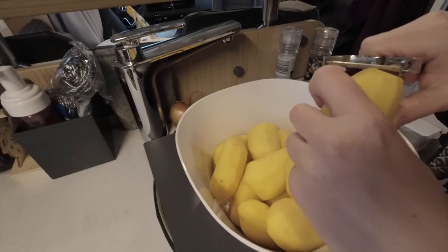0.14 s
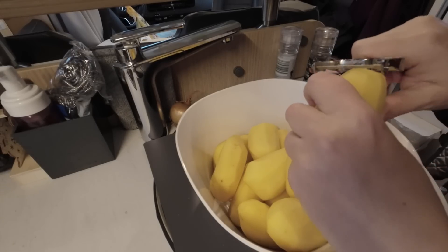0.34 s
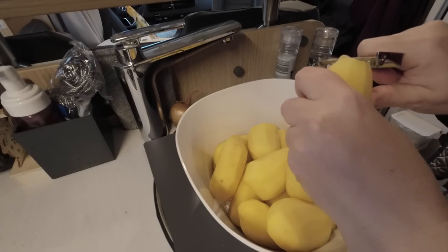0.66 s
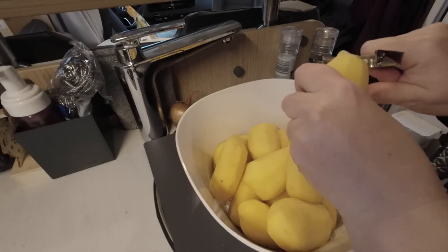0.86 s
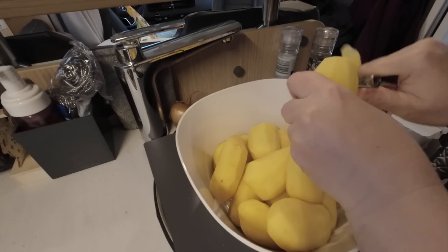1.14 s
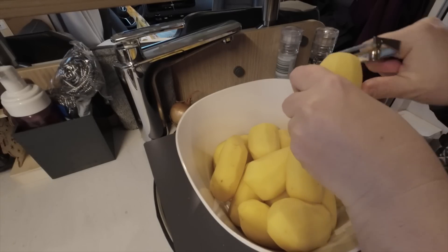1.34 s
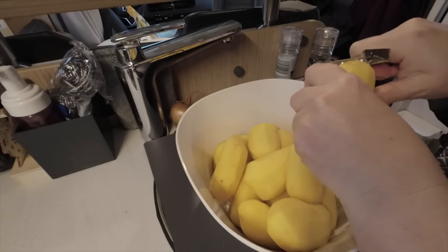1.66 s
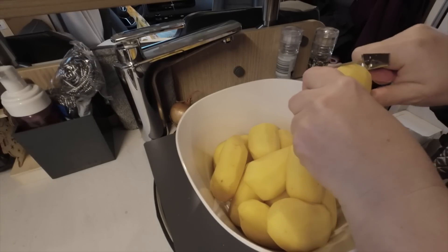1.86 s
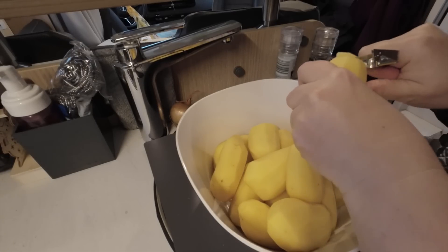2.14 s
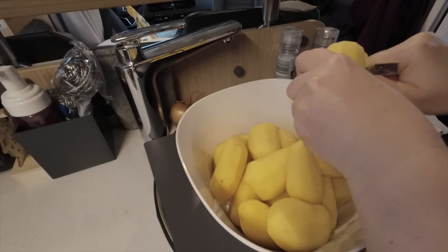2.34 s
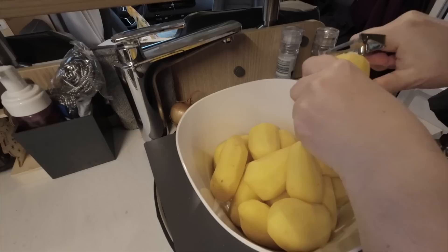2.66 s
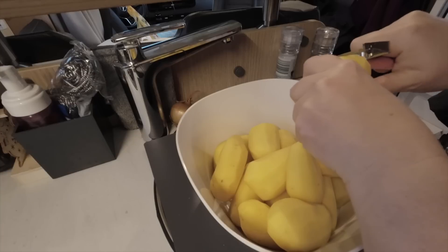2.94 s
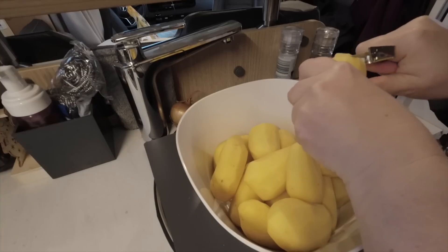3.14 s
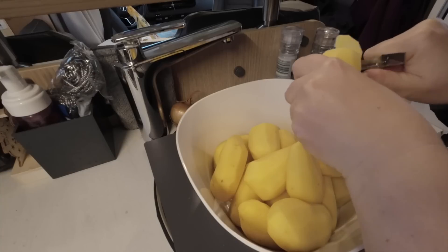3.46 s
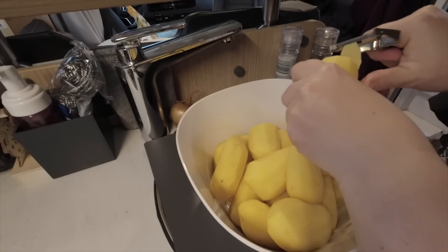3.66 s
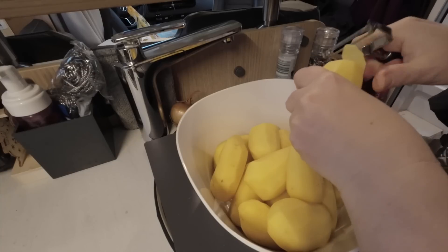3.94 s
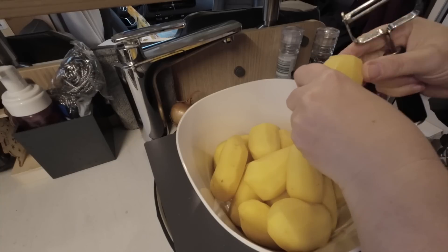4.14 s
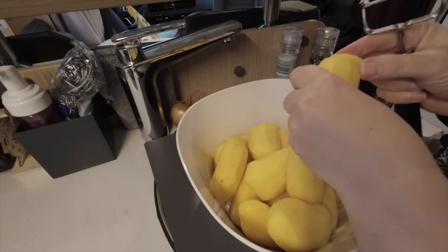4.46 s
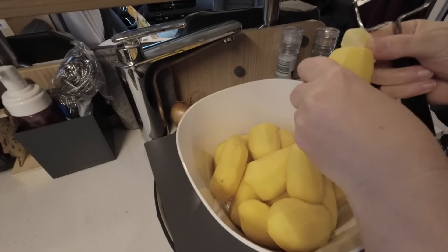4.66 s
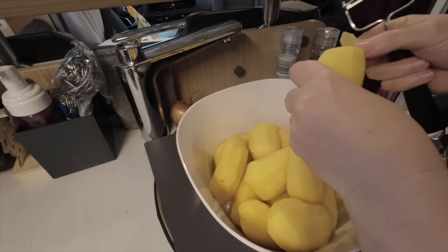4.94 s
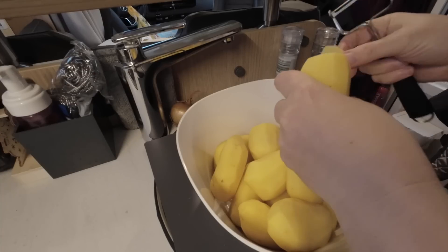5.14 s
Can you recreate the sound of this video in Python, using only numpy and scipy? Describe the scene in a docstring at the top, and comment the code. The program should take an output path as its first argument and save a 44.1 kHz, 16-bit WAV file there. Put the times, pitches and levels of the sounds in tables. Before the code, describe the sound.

A peeler takes crisp, raspy little strokes off a raw potato in a quiet kitchen, then one loud hard knock rings briefly.

```python
"""In a quiet kitchen, close to a small microphone, a swivel peeler slices a raw potato in short strokes.
The blade rasps as shaped noise grains and sings in its resonances; its catches tick as short noise bursts.
The loose frame clacks as struck modes, and the hands thud softly as damped sines.
One hard knock rings a bowl; a short dense tail of noise grains follows and breaks off.
The background, a rumble under a hiss, sinks slowly in level and is higher again after the knock."""
import sys
import numpy as np
from scipy import signal
from scipy.fft import rfft, irfft, next_fast_len
from scipy.io import wavfile

SR = 44100
rng = np.random.default_rng(int(sys.argv[2]) if len(sys.argv) > 2 else 0)


def dump(signal):
    """Clip the signal to [-1, 1] and save it as 16-bit WAV at the path in sys.argv[1]."""
    limited = np.clip(np.atleast_2d(signal).T, -1, 1)
    pcm = np.round(limited * 32767).astype(np.int16)
    wavfile.write(sys.argv[1], SR, pcm)


N = 233818

# spectrum of tearing wet flesh: (frequency [Hz], relative density [dB per Hz])
RASP_SPECTRUM = [(3500, -8), (4700, -34), (5300, -5), (6200, -1), (6700, -11.5), (7600, -2.5),
                 (9000, -13.5), (9700, -9), (11000, 9.5), (12000, 0.5), (13500, -2.5), (15300, -2.5),
                 (16500, -17)]
# duller spectrum of a deep cut: (frequency [Hz], relative density [dB per Hz])
DEEP_SPECTRUM = [(590, -38), (1000, -2), (1510, 1.5), (2130, -6.5), (2370, 5), (3000, -3.5), (5000, -12),
                 (6500, -5), (11000, -120)]

SWING_DB = 20   # envelope rise and fall are the times for this change in level


def from_db(db):
    """Level to amplitude: 20 dB is a factor of ten."""
    return 10 ** (np.asarray(db) / 20)


def rms_one(x):
    """Normalisation to unit root-mean-square amplitude."""
    return x / np.sqrt(np.mean(x ** 2) + 1e-20)


def coloured(x, spectrum):
    """Spectral shaping: x filtered by a (Hz, dB per Hz) table, suppressed by 120 dB outside it; rms 1."""
    size = next_fast_len(N)
    hz = np.arange(size // 2 + 1) * SR / size + 1   # the 1 keeps the logarithm finite
    points = np.array(spectrum)
    shape_db = np.interp(np.log(hz), np.log(points[:, 0]), points[:, 1], left=-120, right=-120)
    shaped = irfft(rfft(x, size) * from_db(shape_db), size)[:N]
    return rms_one(shaped)


def drift(rate_hz):
    """Random fluctuation: white noise through a double-pole low-pass, rms 1."""
    r = np.exp(-2 * np.pi * rate_hz / SR)
    noise = rng.standard_normal(N + SR)   # the first second lets the filter settle
    return rms_one(signal.lfilter([1], [1, -2 * r, r * r], noise)[SR:])


def ring(x, hz, t60):
    """Damped resonance: a unit click starts a sine whose undamped height is 1, losing 60 dB in t60 seconds."""
    r = from_db(-60 / (t60 * SR))
    w = 2 * np.pi * hz / SR
    return signal.lfilter([0, np.sin(w)], [1, -2 * r * np.cos(w), r * r], x + 1e-18)


def resonant(x, peaks):
    """Resonances in parallel, (Hz, width Hz, dB): decay time is inverse to bandwidth; rms 1."""
    total = np.zeros(N)
    for hz, width, db in peaks:
        t60 = np.log(1000) / np.pi / width
        total += from_db(db) * np.sqrt(width) * rms_one(ring(x, hz, t60))
    return rms_one(total)


def grains(per_s, spread_db):
    """Shot noise: impulses at random moments with uneven strength and random sign; rms 1."""
    strength = from_db(spread_db * np.minimum(rng.exponential(1, N), 4))
    signed = strength * rng.choice([-1, 1], N)
    return rms_one(signed * (rng.random(N) < per_s / SR))


def envelope_db(s, rise_s, hold_s, fall_s):
    """Exponential growth and decay: 0 dB through the hold, straight slopes in dB before and after."""
    t = np.arange(N) / SR - s
    before = t / max(rise_s, .001)
    after = (hold_s - t) / max(fall_s, .001)
    return SWING_DB * np.minimum(np.minimum(before, after), 0)


def struck(hits, modes, contact_hz, crack_t60, crack_hz):
    """Modal impact: each hit rings all modes, low-passed by the contact's finite length, plus a noise crack."""
    size = 1500   # crack length in samples
    crack_octave_db = 6.5   # a hit this much brighter per octave has a crack reaching an octave higher
    crack_fade = from_db(-60 * np.arange(size) / SR / crack_t60)
    cracks = rng.standard_normal((len(hits), size)) * crack_fade
    at = [round(hit[0] * SR) for hit in hits]

    out = np.zeros(N)
    for k, (hz, db, t60) in enumerate(modes):
        octaves = np.log2(hz / 2000)   # brightness tilts the modes about 2 kHz
        clicks = np.zeros(N)
        clicks[at] = [from_db(db + hit[1] + hit[2] * octaves) for hit in hits]
        out += (-1) ** k * ring(clicks, hz, t60)   # alternate modes start in opposite phase
    out = signal.sosfilt(signal.butter(2, contact_hz, fs=SR, output="sos"), out)

    for i, (_, db, brightness, crack_db), crack in zip(at, hits, cracks):
        top_hz = crack_hz[1] * 2 ** (brightness / crack_octave_db)
        top_hz = np.clip(top_hz, 2 * crack_hz[0], .45 * SR)
        band = signal.butter(2, [crack_hz[0], top_hz], "band", fs=SR, output="sos")
        out[i:i + size] += from_db(db + crack_db) * signal.sosfilt(band, crack)
    return out


def background():
    """Noise under slow amplitude modulation: a lumpy rumble and a smoother hiss share one level curve."""
    # level of the background noise: (time [s], level about the mean [dB])
    level_curve = [(0, 4.5), (.44, 4), (.7, 2), (1.4, 2), (2.0, 0), (2.4, -.5), (3.0, -2), (4.1, -2.5),
                   (4.48, -1.5), (4.6, 4), (4.95, 3.5), (5.3, 3.5)]
    # low background noise: (frequency [Hz], relative density [dB per Hz])
    rumble_spectrum = [(8.8, -34), (15, 3), (37, -1), (70, -6), (102, -9), (232, -16), (320, -29.5),
                       (420, -49), (700, -120)]
    # high background noise: (frequency [Hz], relative density [dB per Hz])
    hiss_spectrum = [(160, -17.5), (280, -2), (492, -3.5), (703, -6), (989, -10), (1400, -12),
                     (2100, -15.5), (4510, -23.5), (6000, -22), (8780, -29.5), (11000, -22.5),
                     (13200, -29.5), (15500, -27.5), (16500, -43)]
    level_db = np.interp(np.arange(N) / SR, *np.transpose(level_curve))
    # mean level, share of the level curve followed, and random fluctuation
    rumble_db = -54 + 1.27 * level_db + 1.0 * drift(2.8)
    hiss_db = -60 + 0.94 * level_db + 0.23 * drift(7.8)
    rumble = from_db(rumble_db) * coloured(rng.standard_normal(N), rumble_spectrum)
    hiss = from_db(hiss_db) * coloured(rng.standard_normal(N), hiss_spectrum)
    return rumble + hiss


def thuds():
    """Damped oscillation: each soft push is one sine with a rounded start, decaying sooner at higher pitch."""
    # soft contacts of hand and potato: (time [s], level before the rounded start [dB], pitch [Hz])
    contacts = [(.0935, -43.5, 1240), (0.1, -34, 121), (0.161, -44, 90), (0.236, -45, 203),
                (.237, -41.5, 500), (0.236, -41, 1150), (0.492, -36, 146), (0.831, -37.5, 166),
                (1.436, -43, 295), (2.089, -36, 109.5), (2.1, -43, 250), (2.609, -45, 177),
                (2.649, -41.5, 147), (3.133, -38, 970), (3.55, -37, 99)]
    t60_at_120_hz, damping_power = 0.059, 0.48   # seconds; exponent of pitch
    out = np.zeros(N)
    for s, db, hz in contacts:
        t = np.maximum(np.arange(N) / SR - s, 0)
        t60 = t60_at_120_hz * (hz / 120.0) ** -damping_power
        decay = from_db(db - 60 * np.minimum(t / t60, 4))
        rounded_start = 1 - np.exp(-t * hz * 2.5)
        out += decay * np.sin(2 * np.pi * hz * t) * rounded_start
    return out


def strokes():
    """Fracture noise: tearing cells rasp, excite the blade's resonances, and add a duller layer in deep cuts."""
    # bites of the blade: (time of full bite [s], rise [s], hold [s], fall [s],
    # rasp level [dB], deep cut relative to the rasp [dB])
    bites = [(0.137, .002, .001, 0.014, -46.5, -16), (0.243, .004, .001, 0.011, -59.5, 4),
             (0.28, .025, .001, .09, -61, -14), (0.493, 0.0017, 0.0075, 0.041, -44.5, -6.5),
             (0.535, 0.036, .001, 0.078, -56, -22), (0.647, 0.003, .001, 0.065, -62, -4),
             (0.697, 0.018, .001, .023, -48, -11), (0.802, 0.0022, 0.0069, 0.06, -48.5, -11.5),
             (0.925, .003, .003, 0.072, -50.5, -10.5), (1.024, 0.0022, 0.053, 0.031, -50, -11),
             (1.146, 0.016, .001, 0.034, -34.5, -15.5), (1.599, .002, .003, 0.015, -53.5, -12),
             (1.874, .02, .001, 0.05, -63, -10), (1.946, 0.0019, .001, 0.053, -41, -13),
             (1.983, .01, .001, .06, -61, -9), (2.102, 0.018, .001, 0.021, -42.5, -12.5),
             (2.14, 0.0026, .012, 0.046, -51, -8.5), (2.199, 0.0088, 0.037, 0.11, -48.5, -12),
             (2.2995, .001, 0.013, 0.03, -37.5, -16), (2.773, 0.025, .001, 0.055, -57, -10),
             (2.868, .002, .002, 0.024, -56, -15), (2.938, .024, .08, 0.055, -65, -12),
             (3.09, .01, 0.058, 0.048, -52.5, -12), (3.235, 0.0074, .008, 0.017, -52.5, -9),
             (3.288, 0.0012, .001, 0.018, -55, -13), (3.301, 0.02, .001, 0.0079, -52.5, -7),
             (3.353, 0.0093, .006, 0.014, -51.5, -13), (3.445, 0.14, .001, .06, -49, -9.5),
             (3.515, 0.0074, .004, 0.043, -46.5, -14.5), (3.958, .015, .001, .03, -62, -14),
             (4.017, .005, 0.03, .03, -64, -14), (4.703, 0.031, .001, 0.086, -48, -8),
             (4.83, 0.059, .001, 0.044, -52, -17), (4.918, .016, .001, 0.044, -62, -7)]
    # resonances of the blade: (frequency [Hz], width [Hz], relative level [dB])
    blade = [(2410, 58, -15), (5640, 270, -6), (6170, 160, -13), (7300, 310, -13), (10100, 130, 12.5),
             (10300, 150, -5), (10990, 280, -2), (11400, 400, -23), (15500, 710, -5)]
    deep_follows = 0.98   # share of the rasp's swing in dB that the deep cut follows
    slide_db, slide_rise_s, slide_fall_s = -23.5, .04, 0.12   # faint slide before and after each bite

    rasp_gain, deep_gain = np.full(N, 1e-9), np.zeros(N)
    for s, rise_s, hold_s, fall_s, db, deep_db in bites:
        bite_db = envelope_db(s, rise_s, hold_s, fall_s)
        sliding_db = slide_db + envelope_db(s, slide_rise_s, hold_s, slide_fall_s)
        rasp_gain += from_db(db + bite_db) + from_db(db + sliding_db)
        deep_gain += from_db(db + deep_db + deep_follows * bite_db)

    judder = from_db(2.8 * drift(140.0))   # the blade judders
    tears = grains(per_s=5000.0, spread_db=-1.0) * judder
    # a light touch mostly sings in the blade; pressure adds the broad rasp
    broad_share = np.clip((rasp_gain / from_db(-40.5)) ** 0.22, 0, 1.2)
    rasp = broad_share * coloured(tears, RASP_SPECTRUM) + from_db(-7.5) * resonant(tears, blade)
    deep_cut = coloured(tears[::-1], DEEP_SPECTRUM)   # reversed, so its grains fall elsewhere
    return rasp_gain * rasp + deep_gain * deep_cut


def ticks():
    """Transient excitation: each catch is a snap, then a fading burst of rasp, with a short ring of its own."""
    # catches of the blade: (time [s], peak level [dB], ring frequency [Hz])
    catches = [(0.137, -37, 5900), (0.24, -42.5, 5900), (0.4942, -30.5, 10700), (0.6934, -36, 10900),
               (0.8031, -42, 10700), (0.9281, -35.5, 10600), (1.0323, -33, 10900), (1.134, -34.5, 10500),
               (1.1433, -48, 10200), (1.1494, -36, 6400), (1.224, -47, 6030), (1.2409, -44, 5500),
               (1.6007, -34.5, 10500), (1.9456, -27.5, 15200), (1.9556, -29, 10600), (1.9774, -32, 10700),
               (1.9907, -31, 11000), (2.095, -38.5, 10700), (2.302, -22.5, 10900), (2.3144, -40, 6200),
               (2.3214, -29.5, 9810), (2.346, -43, 6310), (2.392, -41, 5900), (2.4054, -46, 6200),
               (2.7597, -41, 6200), (2.7749, -39.5, 10700), (2.869, -39.5, 15200), (3.2346, -44, 10900),
               (3.288, -40, 10400), (3.4333, -33.5, 6300), (3.5159, -30.5, 6300), (3.674, -51.5, 4770),
               (4.0101, -51, 5400), (4.6957, -38, 10000), (4.8264, -36.5, 11600), (4.8387, -36.5, 11000)]
    size = 3000   # tick length in samples
    out, t = np.zeros(N + size), np.arange(size) / SR
    snap = from_db(-60 * t / 0.0052)   # t60 in seconds
    tail = from_db(-7.0 - 60 * t / 0.048)
    broad = coloured(rng.standard_normal(N), RASP_SPECTRUM)
    broad = broad + from_db(-19.0) * coloured(rng.standard_normal(N), DEEP_SPECTRUM)
    for s, db, hz in catches:
        at = round(s * SR)
        burst = broad[at:at + size] * (snap + tail)
        burst = burst + from_db(-14) * ring(burst, hz, t60=.004)
        out[at:at + size] += from_db(db) * burst / np.max(np.abs(burst))
    return out[:N]


def clacks():
    """Modal impact: the loose frame rings in its own modes at each clack."""
    # clacks: (time [s], level of the hit [dB], brightness [dB per octave], crack relative to that level [dB])
    hits = [(1.4345, -38, 2, 9), (2.4938, -65.5, 3, 13.5), (2.6065, -54.5, -6, 17.5),
            (2.6554, -56.5, -4, 1), (3.549, -57, -3, 5), (3.9357, -65, -3.5, 20)]
    # modes of the frame: (frequency [Hz], relative level [dB], t60 [s])
    frame = [(1772, -5, 0.091), (2243, -2.5, 0.067), (3270, -9, 0.059), (3830, -20, 0.11),
             (5080, -16, 0.062), (6240, -10, 0.041), (6970, -19, 0.087), (7180, -5, 0.03),
             (7854, -15, 0.051), (9770, -14, 0.058)]
    return struck(hits, frame, contact_hz=9150, crack_t60=0.017, crack_hz=[1400, 9000])


def mode_coloured(x, modes, stretch):
    """Resonant filtering: x coloured at mode pitches, longer t60 weighing more, t60 stretched; rms 1."""
    return rms_one(sum(from_db(db) * t60 * rms_one(ring(x, hz, t60 * stretch)) for hz, db, t60 in modes))


def knock():
    """Modal impact and shaped noise: the bowl's modes ring, then a short dense tail follows and breaks off."""
    # the knock and a weaker, duller pulse after it: (time [s], level of the pulse [dB],
    # brightness [dB per octave], crack relative to that level [dB])
    pulses = [(4.4991, -7, -1, -5.5), (4.5075, -24.5, -3, -11)]
    # modes of the bowl: (frequency [Hz], relative level [dB], t60 [s])
    bowl = [(104.9, -41.5, 0.33), (165.2, -26.5, 0.2), (249, -25, 0.15), (297, -23.5, 0.22),
            (393.2, -26, 0.16), (491, -19, 0.099), (600, -27, 0.17), (799.7, -11.5, 0.057),
            (1110, -19, 0.027), (1508, -17.5, 0.14), (1922, -17, 0.12), (2100, -5, 0.0297),
            (2280, -21, .02), (2257, -4.5, 0.067), (2358, -1, 0.031), (2616, -20.5, 0.066),
            (2980, -17, 0.055), (3320, -20, .04), (3588, -19, 0.078), (3872, -20, 0.065), (3910, -45, .12),
            (4925, -23.5, 0.12), (6390, -48, .06), (6950, -41.5, .04)]
    # bright part of the tail: (frequency [Hz], relative density [dB per Hz])
    bright_spectrum = [(1000, -15), (2300, -24), (2800, -5), (3600, -7.5), (5200, -14.5), (5800, -19),
                       (7100, -7), (8100, -17.5), (8800, -11.5), (9600, -13.5), (10800, -7), (11900, -12),
                       (12600, -25), (16500, -35)]
    # dull part of the tail: (frequency [Hz], relative density [dB per Hz])
    dull_spectrum = [(90, -24.5), (150, -8), (300, 9), (500, 8.5), (800, -3), (950, -31), (1300, -4)]
    start_s, stop_s, stop_db_per_s = 4.505, 4.61, 346
    sizzle_stop_s, sizzle_above_hz = 4.585, 5400   # the treble fades more slowly but stops sooner

    t = np.maximum(np.arange(N) / SR - start_s, 0)
    bright_db = -38 - 149 * t   # fades in dB per second
    dull_db = np.maximum(-27.5 - 326 * t, -40.5)   # drops fast, then holds
    sizzle_stop_db = stop_db_per_s * np.maximum(t + start_s - sizzle_stop_s, 0)
    sizzle_db = -45 - 36 * t - sizzle_stop_db
    on = from_db(envelope_db(start_s, 0.0021, stop_s - start_s, SWING_DB / stop_db_per_s))

    tail_grains = grains(per_s=9000.0, spread_db=2.0) * from_db(1.9 * drift(40.0))
    high_pitches = mode_coloured(tail_grains, [mode for mode in bowl if mode[0] > 1200], stretch=1)
    low_pitches = mode_coloured(tail_grains, [mode for mode in bowl if mode[0] < 1200], stretch=2)
    broad = coloured(tail_grains, bright_spectrum)
    treble = signal.sosfilt(signal.butter(4, sizzle_above_hz, "high", fs=SR, output="sos"), broad)
    rest = signal.sosfilt(signal.butter(4, sizzle_above_hz, fs=SR, output="sos"), broad)

    sizzle = from_db(sizzle_db) * rms_one(treble)
    bright = sizzle + from_db(bright_db) * (rest + from_db(3.0) * high_pitches)
    dull = from_db(dull_db) * rms_one(coloured(tail_grains, dull_spectrum) + from_db(4.5) * low_pitches)
    blow = struck(pulses, bowl, contact_hz=4860, crack_t60=.03, crack_hz=[1500, 5000])
    return blow + on * (bright + dull)


def scene():
    """Linear superposition of all sources at one microphone."""
    return (background() + thuds() + strokes() + ticks() + clacks() + knock())[None]


def record(dry):
    """Linear filtering: the small microphone is deaf in a band of the high treble; the top is cut."""
    dip_hz, dip_width_hz, dip_db, cutoff_hz = 13080, 2840, -14, 15800
    depth = from_db(dip_db / 2)   # used in numerator and denominator, half the dip each
    a = np.tan(np.pi * dip_width_hz / SR)
    middle = -2 * np.cos(2 * np.pi * dip_hz / SR)
    zeros = [1 + a * depth, middle, 1 - a * depth]
    poles = [1 + a / depth, middle, 1 - a / depth]
    dipped = signal.lfilter(zeros, poles, dry)
    return signal.sosfilt(signal.ellip(12, .5, 75, cutoff_hz, fs=SR, output="sos"), dipped)


dry = scene()
out = record(dry)
dump(out)
```